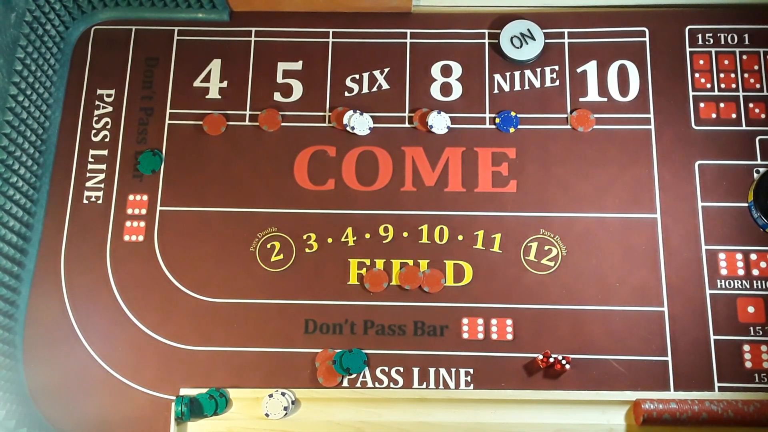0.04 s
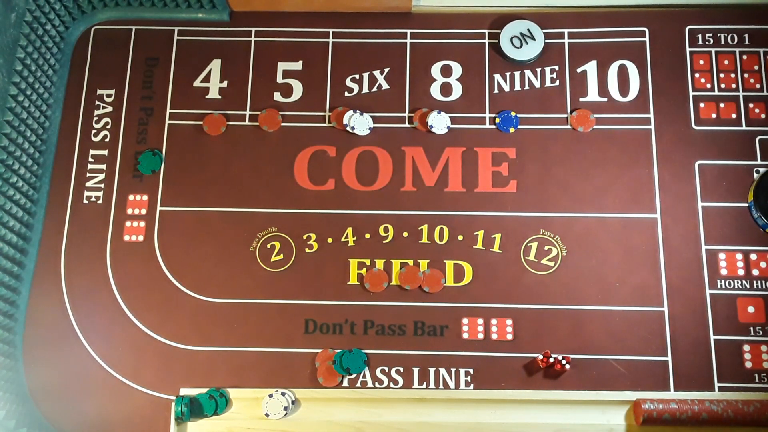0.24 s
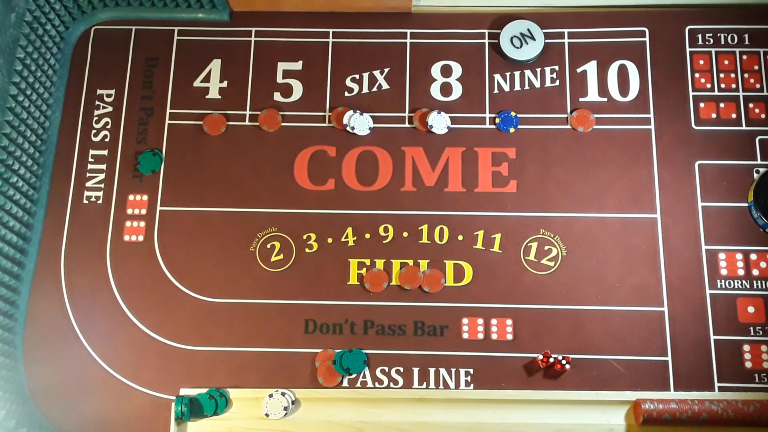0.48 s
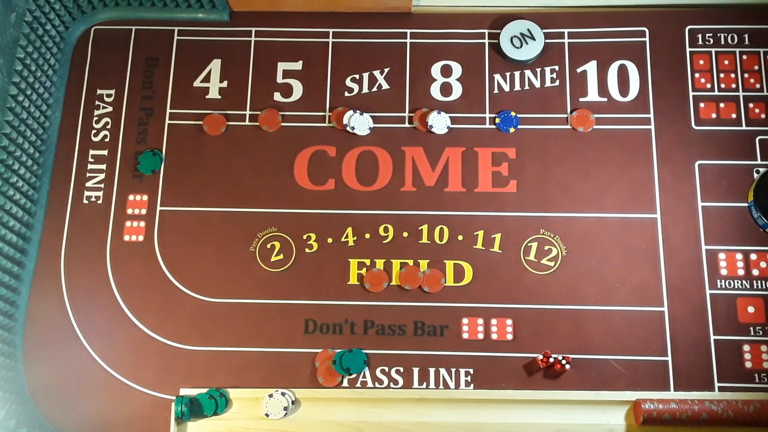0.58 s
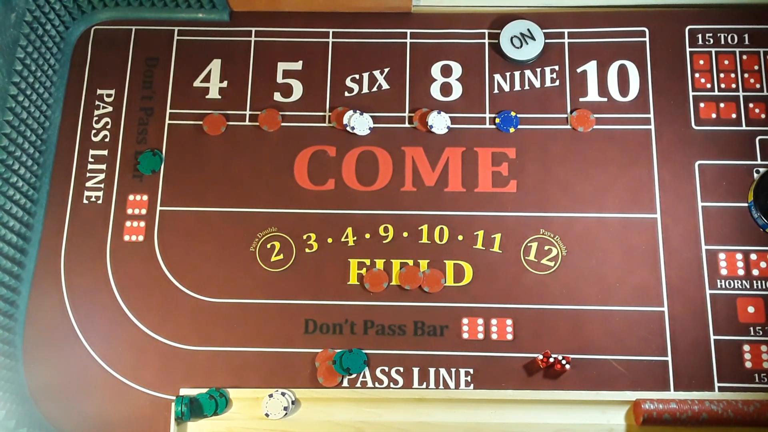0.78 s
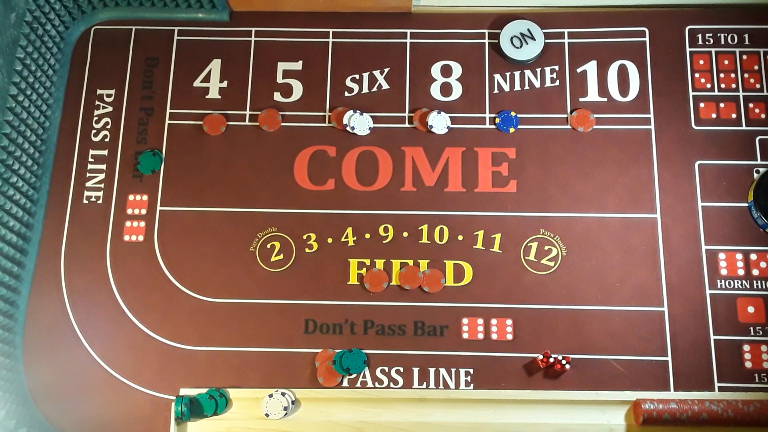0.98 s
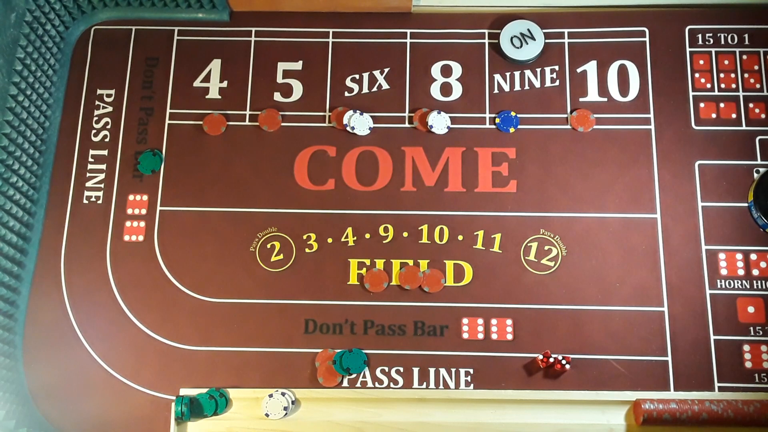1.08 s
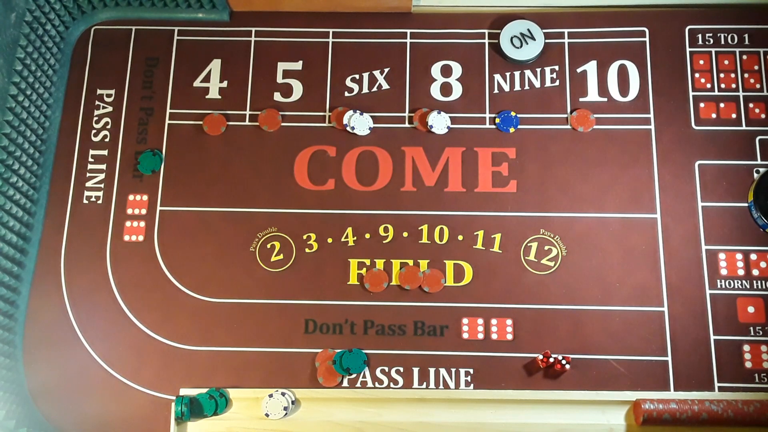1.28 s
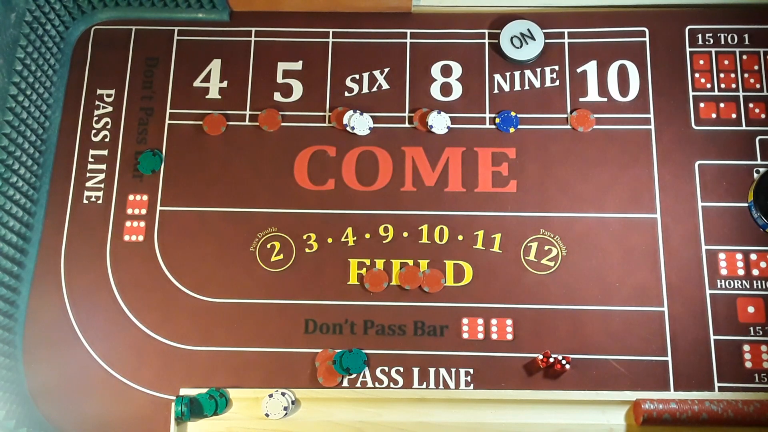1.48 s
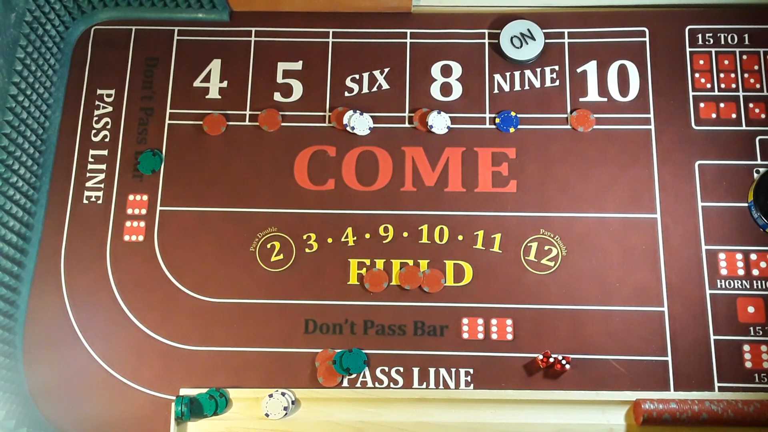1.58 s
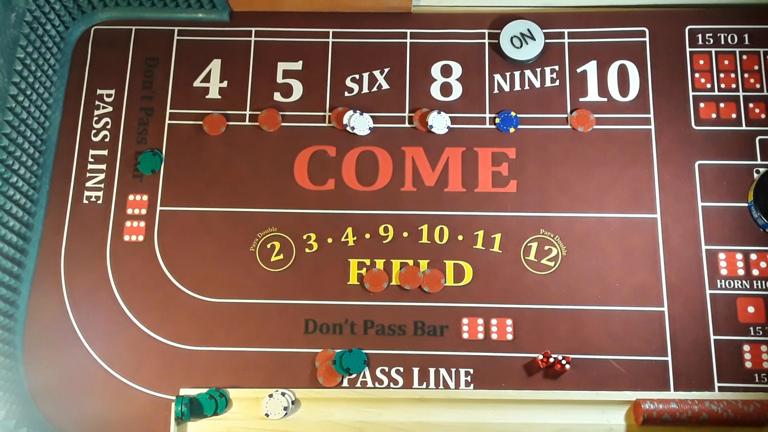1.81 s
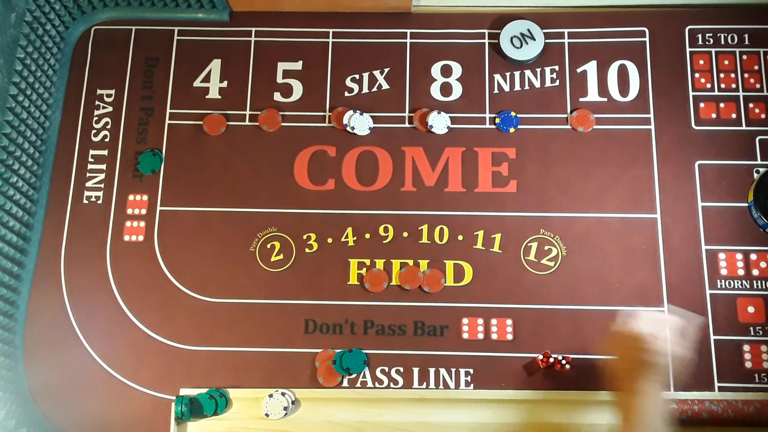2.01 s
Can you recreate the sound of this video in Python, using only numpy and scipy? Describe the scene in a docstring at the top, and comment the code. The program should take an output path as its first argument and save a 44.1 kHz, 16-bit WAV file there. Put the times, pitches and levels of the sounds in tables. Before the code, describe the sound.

Casino chips clack and slide together in short bursts on a felt gaming table.

```python
"""A faint low ring lingers at the start, over the soft hiss of ventilation. Then casino chips slide,
clack face to face and rub in the hand, small stacks clatter shut and one thuds on a felt gaming table.
Sliding is a stream of tiny ticks from rough faces; a hit makes the chip's rim and the table ring.
The walls of the table throw each sound back within milliseconds, then the fairly live room rings on."""
import sys
import numpy as np
from scipy import signal
from scipy.fft import rfft, irfft, next_fast_len
from scipy.io import wavfile

SR = 44100
rng = np.random.default_rng(int(sys.argv[2]) if len(sys.argv) > 2 else 0)


def unload_audio(sound):
    """Save the sound as a 16-bit wav file, at the path given as the first command line argument."""
    columns = np.transpose(np.atleast_2d(sound))
    # keep every value between -1 and 1, then stretch to whole-number steps
    steps = np.round(np.clip(columns, -1, 1) * 32767)
    wavfile.write(sys.argv[1], SR, steps.astype(np.int16))


N = 90404

# tone of the ventilation, and of the part that differs between the ears (f/Hz, level/dB)
AIR_TONE = [(15, -9), (25, -0.5), (169, -8.5), (253, -7), (433, -11.5), (684, -19), (762, -26.5),
            (945, -4.5), (1020, -14), (1850, -17.5), (3930, -22), (4750, -23.5), (5880, -29), (9810, -28),
            (15500, -21)]
AIR_SIDE_TONE = [(60, 5.5), (300, -6.5), (1000, 2), (15000, -0.5)]
# first the faint low ring, then chips rubbing in the hand (t/s, length/s, level/dB, low murmur/dB)
FAINT_EVENTS = [(-.02, 0.24, -36, 6.5), (.768, 0.052, -34.5, -5), (0.924, 0.066, -33, -6),
                (.995, 0.068, -32, -24), (1.597, 0.08, -33.5, -12)]
# tone of their soft rustle, and of the low murmur under it (f/Hz, level/dB)
RUSTLE_TONE = [(200, -9), (800, -4.5), (2200, -1.5), (3200, -6.5), (5000, -10.5), (6300, -12.5),
               (7500, -32.5), (16000, -14)]
LOW_MURMUR_TONE = [(100, -15), (280, -5.5), (420, 1.5), (620, -5.5), (900, -13.5), (3000, -32)]
# chips slide on chips (t/s, length/s, level/dB, swell/dB, low grain/dB, fine hiss/dB, squeak/dB)
SLIDE_EVENTS = [(0, .012, -41.5, 0.5, -3.5, -17.5, -0.5), (0.123, 0.0056, -39.5, -15, -6, -19, 4.5),
                (0.138, 0.079, -33, -8, 1.5, -17, -9), (0.167, 0.015, -25, 10, 6.5, -28, -5),
                (0.183, .011, -11.5, 3.5, -4, -14, -11.5), (0.3196, .010, -12, 10, -4.5, -12, -7),
                (0.335, .036, -20, -6, -1.5, -8.5, -4), (1.278, 0.015, -22.5, 7, -2.5, -8, -13),
                (1.294, 0.013, -16, 25, -2.5, -18, -6.5), (1.31, 0.014, -22.5, 5, 4, -19, -14),
                (1.33, 0.0064, -7.5, 8, -23, -3, -12), (1.3390, 0.0027, -6.5, -8, -34, -3, -13.5)]
# tones of a slide: main rasp, low grain, fine hiss and squeak (f/Hz, level/dB)
RASP_TONE = [(300, -31), (1000, -29), (2500, 1), (3800, 1.5), (4250, -0.5), (4600, -0.5), (5000, 0),
             (6300, -6.5), (7200, -17), (16000, -14)]
LOW_GRAIN_TONE = [(80, -12.5), (200, -8), (350, -4.5), (700, -5.5), (1300, 4), (2400, 1), (4000, -8),
                  (16000, -23)]
HISS_TONE = [(1000, -26), (6000, -16.5), (7500, -5), (9000, -8), (10400, 3), (11700, -8), (12600, 5.5),
             (13800, -13.5), (16000, 0)]
SQUEAK_TONE = [(4500, -31.5), (5700, -3), (6250, -1), (6700, -10), (7200, -30), (16000, -53)]
# chip meets chip (t/s, level/dB, f/Hz, table knock/dB, rim ring/dB)
CLACK_EVENTS = [(.1642, -38, 1900, 5, -17), (.1718, -21, 1670, -16, -13), (.1859, -20.5, 1670, -9.5, -26),
                (0.2361, -18, 1360, -14, -23.5), (0.2359, -12, 1270, -16, -21),
                (0.2863, -0.5, 1700, -18, -21), (0.3271, -4.5, 1930, -9.5, -21.5),
                (0.334, -11, 1900, -8, -27), (.3425, -8, 1800, -8.5, -37), (1.0460, -2, 1880, -16, -49),
                (1.0580, -5.5, 1870, -23.5, -38.5), (1.0651, -24, 1900, -20, -39),
                (1.0723, -5.5, 1960, -19, -38), (1.0758, -7.5, 1860, -12.5, -36),
                (1.0848, -9.5, 1900, -18, -26), (1.0915, -15, 1900, -17.5, -31),
                (1.4614, -6, 1800, -9, -13), (1.4768, -22.5, 1900, 1.5, -39.5),
                (1.6505, -7.5, 1900, -19, -6.5), (1.6544, -13, 1860, -8.5, -14),
                (1.7113, -6, 1890, -7, -25), (1.7236, -10, 1740, -24, -13), (1.7370, -15, 1900, -5, -27),
                (1.7470, -12.5, 1740, -34, -14), (1.7650, -32, 1770, -7, -5), (1.784, -29.5, 1846, -21, -3)]
# the notes that a chip's rim and the table ring with (f/Hz, width/Hz, level/dB)
RIM_NOTES = [(2400, 108.5, -23), (3780, 160, -5), (4150, 140, 11), (4490, 560, 20.5), (5740, 200, 12),
             (6300, 150, -7), (10500, 650, -20), (12600, 500, -20.5)]
TABLE_NOTES = [(104.5, 25, -15.5), (175.4, 40, -16.5), (317.5, 13.3, -8), (443.5, 196, -8),
               (589.6, 30, 3.5), (674, 209, 2.5), (769, 202, -3), (1246, 300, -24.5)]
# a stack claps shut (t/s, level/dB, length/s, table knock/dB, edge tick/dB, rim ring/dB)
CLATTER_EVENTS = [(0.3739, -0.5, 0.0067, -11, -35.5, -14), (1.3400, -17.5, .002, -14, -1, 10.5),
                  (1.648, -12.5, 0.0065, -3, -14, 0.5)]
# tone of that clap, and of the bright tick of the edges (f/Hz, level/dB)
CLATTER_TONE = [(200, -27.5), (430, -22), (600, -7.5), (1000, -7.5), (1600, -5.5), (2400, -0.5), (3100, -2),
                (3900, 1), (4800, -8), (6000, -13), (7300, -20.5), (8500, -39), (16000, -46)]
TICK_TONE = [(500, -18.5), (3000, -35), (6500, -11.5), (8500, 15), (11000, 8), (16000, 6)]
# a stack is set down on the felt (t/s, level/dB)
THUD_EVENTS = [(1.2985, -5), (1.3016, -12), (1.319, -22), (1.6210, -33)]
# echoes from the walls of the table (left delay/ms, right delay/ms, level/dB)
WALL_ECHOES = [(1.9, 1.3, -23), (2.8, 2, -19.5), (3.7, 3.6, -16.5), (4.6, 4.4, -14), (6.2, 5.7, -9)]
# standing waves: notes trapped between those walls (f/Hz, width/Hz, level/dB)
HOLLOW_NOTES = [(294, 9, -10), (585, 14, -1), (686, 9, -3), (722, 9, -3), (1292, 9, -4), (1492, 9, -5),
                (1643, 12, -4), (1749, 10, -2), (1846, 14, -3), (2013, 12, -1), (2224, 14, -4),
                (2543, 12, 2), (2896, 12, -2), (3525, 16, -2), (3779, 14, 0), (4236, 14, -2)]
# tone of the sound scattered by the table's rail (f/Hz, level/dB)
RAIL_TONE = [(250, 0), (900, 5.5), (16000, 2.5)]
# how long the room takes to fade by 60 dB (f/Hz, t/s)
ROOM_FADE_TIMES = [(100, 0.54), (300, 0.42), (800, 0.48), (2000, 0.34), (4500, 0.34), (8000, 0.25),
                   (14000, 0.17)]
# tone of the room's ring (f/Hz, level/dB)
ROOM_RING_TONE = [(100, 3.5), (500, 0), (2000, 0.5), (5000, -1.5), (12000, 1)]
# extra level on the right compared with the left (f/Hz, level/dB)
RIGHT_EXTRA = [(300, 1.5), (1500, -0.1), (4000, 2.5), (11000, 3)]

SPOTS = 5  # places on the chips that sound, each with its own echoes
TICKS_PER_S, TICK_SPREAD_DB = 5000, 8
CLACK_WIDTH, CLACK_TOP_HZ = 0.86, 3130  # width as a share of the pitch; soft contact dulls the treble
RATTLE_DB, RATTLE_SWELL_DB = 4.5, 1  # level against the first contact; rise during the rattle
LEFT_LATE_S, RIGHT_LEAD_DB = .00016, 2
SCATTER_PEAK_S, HOLLOW_DB = 0.00275, -15
ROOM_DB, ROOM_BUILD_S, SHARED_BASS_HZ = 1, 0.0053, 510
AIR_DB, FELT_TOP_HZ = -66.5, 1900
LOW_CUT_HZ, TOP_HZ = 91, 15850


def undb(db):
    """Turn decibels into a number to multiply by."""
    return 10 ** (np.asarray(db) / 20)


def unit(x):
    """Scale to an energy of one."""
    return x / np.sqrt(np.sum(x ** 2) + 1e-18)


def along(points, hz):
    """Read between (f/Hz, value) points, with octaves evenly spaced."""
    f, v = np.array(points, float).T
    return np.interp(np.log(np.maximum(hz, 1)), np.log(f), v)


def impulse(size=4096):
    """One bare contact."""
    return np.r_[1., np.zeros(size - 1)]


def click(tone, size=1024):
    """A click with the given tone and a sharp start."""
    hz = np.fft.rfftfreq(size, 1 / SR)
    cepstrum = irfft(np.log(undb(along(tone, hz))))
    cepstrum[1:size // 2] *= 2  # folding this in half moves the energy to the start
    cepstrum[size // 2 + 1:] = 0
    return unit(irfft(np.exp(rfft(cepstrum))))


def colour(x, tone):
    """Shape a long sound by (f/Hz, level/dB) points."""
    hz = np.fft.rfftfreq(len(x), 1 / SR)
    return irfft(rfft(x) * undb(along(tone, hz)), len(x))


def resonate(x, hz, width):
    """Ring at one note; the smaller the width, the longer it rings."""
    return signal.lfilter(*signal.iirpeak(hz, hz / width, fs=SR), x)


def ring(notes, size=4096):
    """An object answers one contact with all its notes at once."""
    return unit(sum(undb(db) * resonate(impulse(size), hz, width) for hz, width, db in notes))


def add(out, s, x):
    """Mix x into out at s seconds, or at the start if s is below zero."""
    i = int(max(s, 0) * SR)
    out[..., i:i + x.shape[-1]] += x[..., :max(out.shape[-1] - i, 0)]


def grains(length, swell_db, tone):
    """Dense, uneven ticks that swell or fade during a stroke, each from one spot on the chips."""
    n = max(int(length * SR), 2)
    chance, spot = rng.random((2, SR // 4))[:, :n]
    sign, size = rng.standard_normal((2, SR // 4))[:, :n]
    strength = undb(TICK_SPREAD_DB * size + np.linspace(0, swell_db, n))
    ticks = (chance < TICKS_PER_S / SR) * np.sign(sign) * strength
    by_spot = ticks * (np.floor(spot * SPOTS) == np.arange(SPOTS)[:, None])
    return unit(signal.fftconvolve(by_spot, click(tone)[None], axes=1))


def air():
    """Steady ventilation and hiss: one noise common to both ears, another that sets them apart."""
    common, side = (colour(rng.standard_normal(N), AIR_TONE) for _ in range(2))
    apart = colour(side, AIR_SIDE_TONE) * np.array([[1], [-1]])
    return undb(AIR_DB) * (common + apart) / common.std()


def low_ring_and_rubs():
    """A faint low ring (300-600 Hz) lingers at the start; later, chips rub softly in the hand."""
    out = np.zeros((SPOTS, N))
    for s, length, db, murmur_db in FAINT_EVENTS:
        rustle = grains(length, 0, RUSTLE_TONE)
        murmur = undb(murmur_db) * grains(length, 0, LOW_MURMUR_TONE)
        add(out, s, undb(db) * (rustle + murmur))
    return out


def slides():
    """Rough chip faces catch on each other many times and rasp."""
    out = np.zeros((SPOTS, N))
    for s, length, db, swell_db, low_db, hiss_db, squeak_db in SLIDE_EVENTS:
        parts = (RASP_TONE, 0), (LOW_GRAIN_TONE, low_db), (HISS_TONE, hiss_db), (SQUEAK_TONE, squeak_db)
        for tone, part_db in parts:
            add(out, s, undb(db + part_db) * grains(length, swell_db, tone))
    return out


def clacks():
    """Flat faces meet in a very short pop; the rim rings and the table knocks."""
    out, rim, table = np.zeros((SPOTS, N)), ring(RIM_NOTES), knock()
    soften = signal.butter(2, CLACK_TOP_HZ, fs=SR)
    for k, (s, db, hz, knock_db, rim_db) in enumerate(CLACK_EVENTS):
        width = hz * CLACK_WIDTH
        pop = resonate(resonate(impulse(), hz, width), hz, width)
        for part, part_db in ((pop, 0), (table, knock_db), (rim, rim_db)):
            add(out[k % SPOTS], s, undb(db + part_db) * unit(signal.lfilter(*soften, part)))
    return out


def knock():
    """The table rings, dulled by its cushion of felt."""
    felt = signal.butter(2, FELT_TOP_HZ, fs=SR)
    return unit(signal.lfilter(*felt, ring(TABLE_NOTES)))


def clatters():
    """One hard contact, then the other chips of the stack rattle shut within milliseconds."""
    out = np.zeros((SPOTS, N))
    for s, db, length, knock_db, tick_db, rim_db in CLATTER_EVENTS:
        for tone, part_db in ((CLATTER_TONE, 0), (TICK_TONE, tick_db)):
            add(out[0], s, undb(db + part_db) * click(tone))
            add(out, s, undb(db + part_db + RATTLE_DB) * grains(length, RATTLE_SWELL_DB, tone))
        add(out[1], s, undb(db + knock_db) * knock())
        add(out[2], s, undb(db + rim_db) * ring(RIM_NOTES))
    return out


def thuds():
    """A stack is set down; felt cushions the blow, so only the table sounds."""
    out = np.zeros((SPOTS, N))
    for k, (s, db) in enumerate(THUD_EVENTS):
        add(out[k % SPOTS], s, undb(db) * knock())
    return out


def room_ring(t, shared_noise):
    """Countless echoes blur into fading noise; both ears share the bass, and the treble dies first."""
    hz = np.fft.rfftfreq(len(t), 1 / SR)
    alike = 1 / (1 + (hz / SHARED_BASS_HZ) ** 4)
    own_noise = rng.standard_normal(len(t))
    spectrum = np.sqrt(alike) * rfft(shared_noise) + np.sqrt(1 - alike) * rfft(own_noise)
    out = np.zeros(len(t))
    for band_hz, fade_s in ROOM_FADE_TIMES:
        band = along([(f, f == band_hz) for f, _ in ROOM_FADE_TIMES], hz)
        out += irfft(spectrum * band, len(t)) * undb(-60 * t / fade_s)
    build_up = 1 - np.exp(-t / ROOM_BUILD_S)
    return unit(colour(out, ROOM_RING_TONE) * build_up)


def echoes(sound):
    """Sound from a spot to the right arrives directly, off the table's walls and rail, and via the room."""
    t, out = np.arange(2 ** 15) / SR, []
    shared_noise, hollow = rng.standard_normal(len(t)), ring(HOLLOW_NOTES, size=len(t))
    for ear, side in enumerate((-1, 1)):  # left, then right
        path = np.zeros(len(t))
        add(path, LEFT_LATE_S * (ear == 0), undb([side * RIGHT_LEAD_DB / 2]))  # direct sound
        for *delay_ms, db in WALL_ECHOES:
            add(path, delay_ms[ear] / 1000, undb([db]))
        rail_noise = colour(rng.standard_normal(len(t)), RAIL_TONE)
        scatter = unit(rail_noise * t * np.exp(-t / SCATTER_PEAK_S))
        path += scatter + undb(HOLLOW_DB) * hollow + undb(ROOM_DB) * room_ring(t, shared_noise)
        out.append(signal.fftconvolve(sound, path)[:N])
    return np.array(out)


def facing(x, side):
    """The right microphone (side 1) gets more treble and a little more bass than the left (side -1)."""
    padded = np.pad(x, (0, next_fast_len(N + 999, True) - N))
    return colour(padded, [(hz, side * db / 2) for hz, db in RIGHT_EXTRA])[:N]


def scene():
    """Each spot on the chips stirs the room in its own way; quiet air lies beneath."""
    spots = clacks() + clatters() + thuds() + slides() + low_ring_and_rubs()
    left, right = sum(echoes(spot) for spot in spots)
    return np.array([facing(left, -1), facing(right, 1)]) + air()


def record(dry):
    """The recorder thins the deep bass and cuts the highest treble."""
    low_cut = signal.butter(2, LOW_CUT_HZ, "high", fs=SR, output="sos")
    top_cut = signal.ellip(10, .2, 70, TOP_HZ, fs=SR, output="sos")
    return signal.sosfilt(top_cut, signal.sosfilt(low_cut, dry))


dry = scene()
out = record(dry)
unload_audio(out)
```